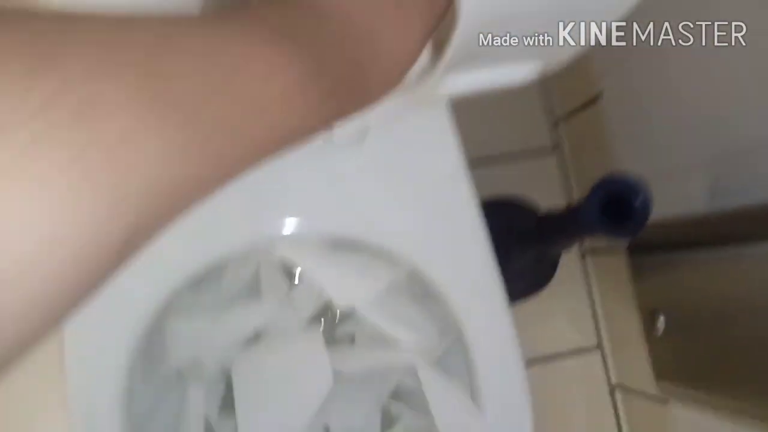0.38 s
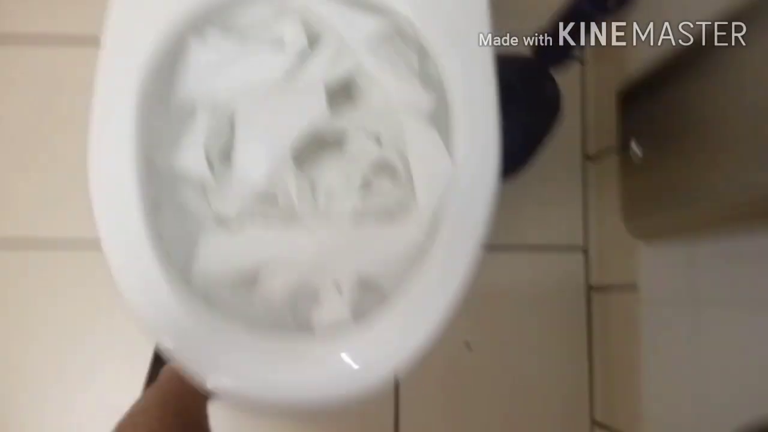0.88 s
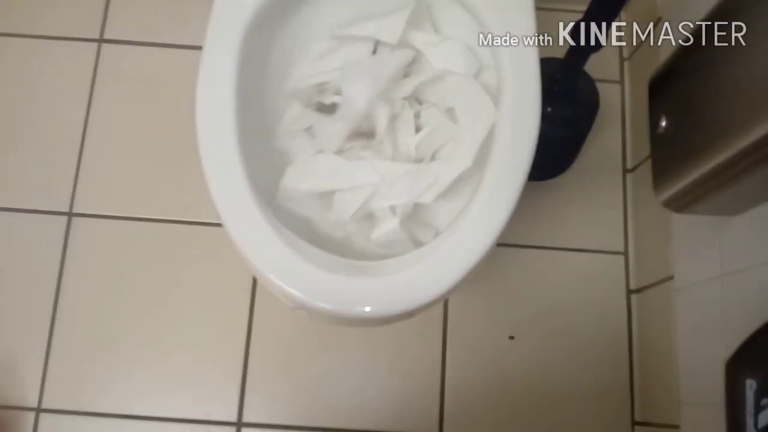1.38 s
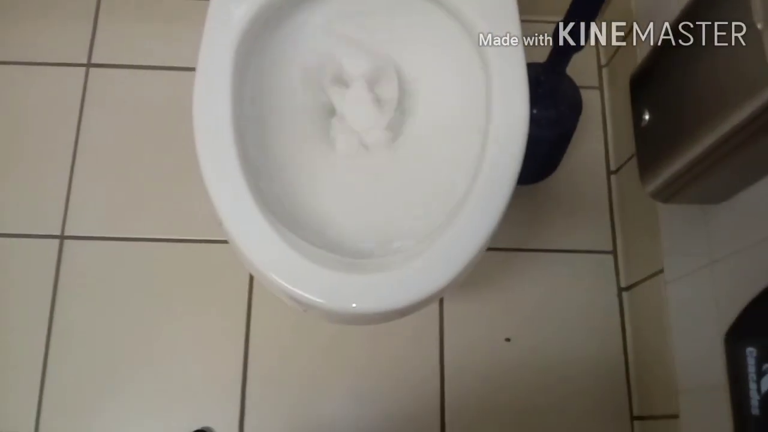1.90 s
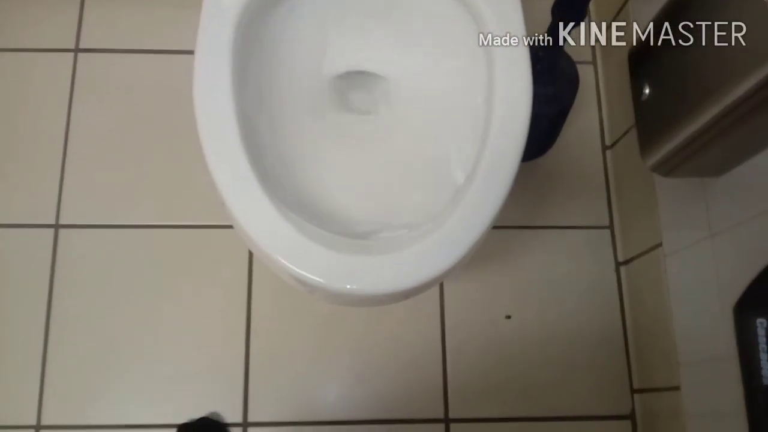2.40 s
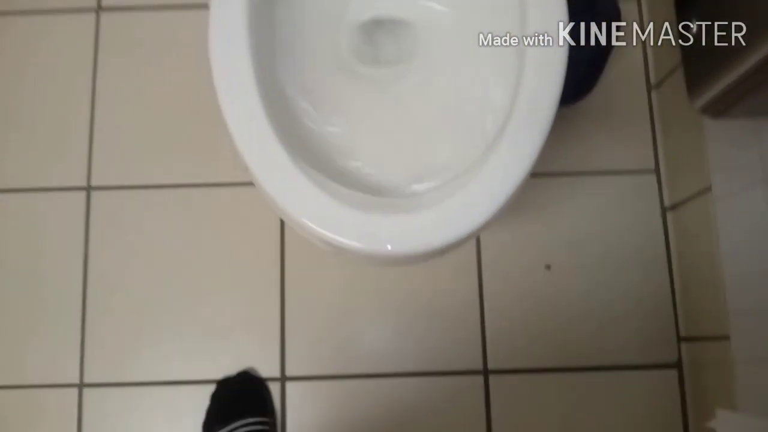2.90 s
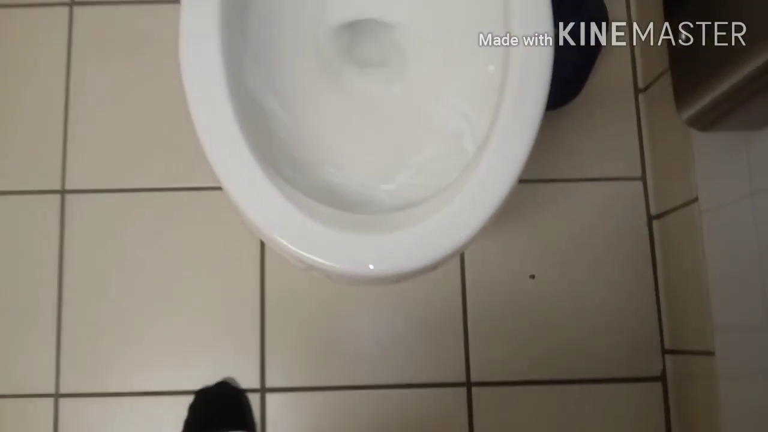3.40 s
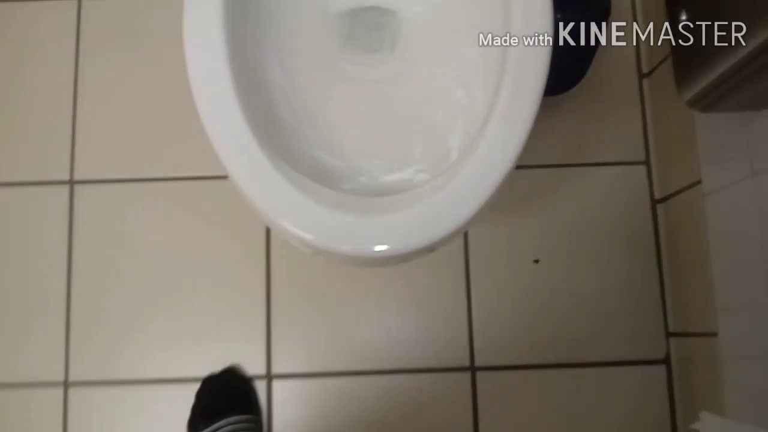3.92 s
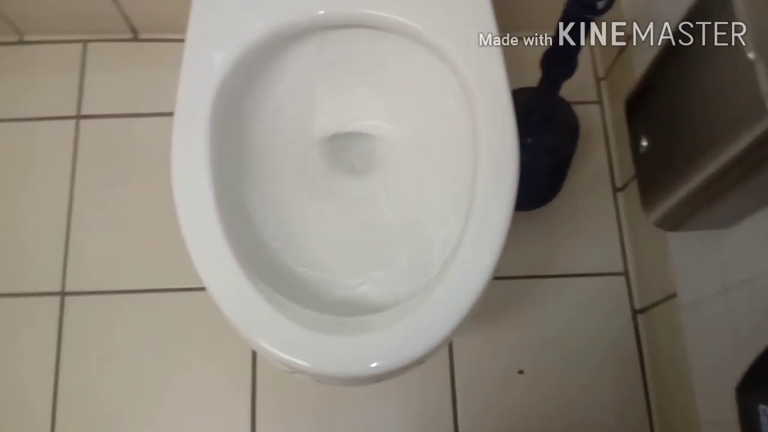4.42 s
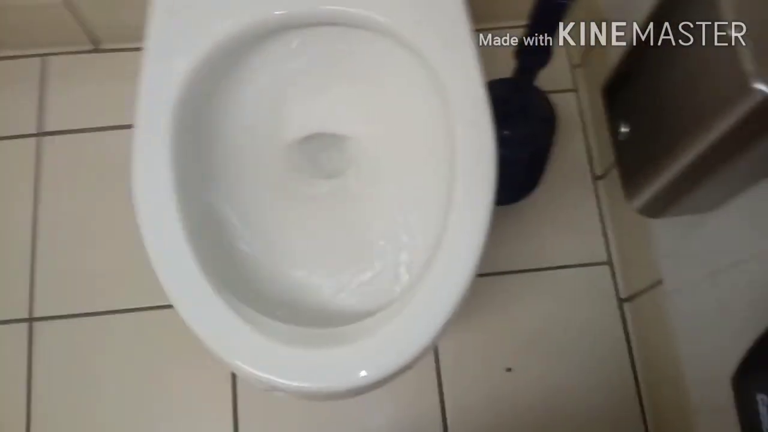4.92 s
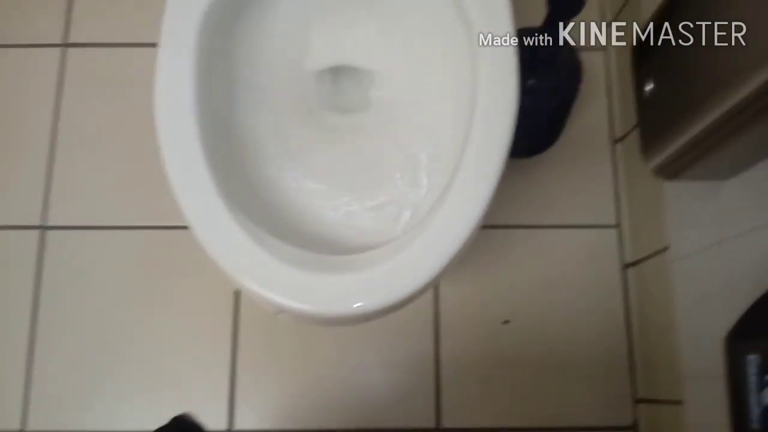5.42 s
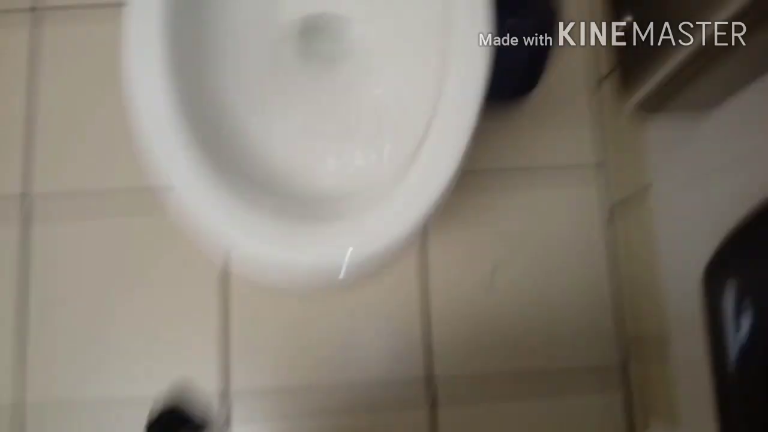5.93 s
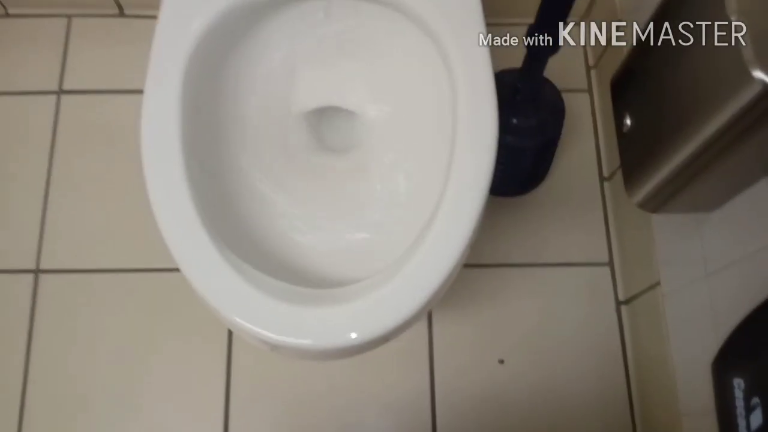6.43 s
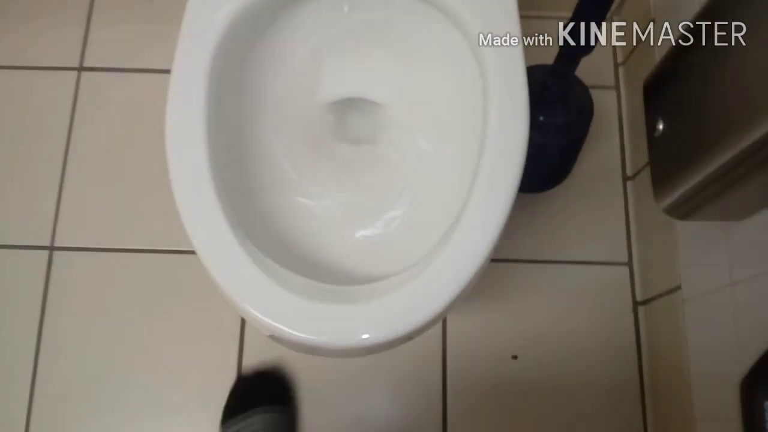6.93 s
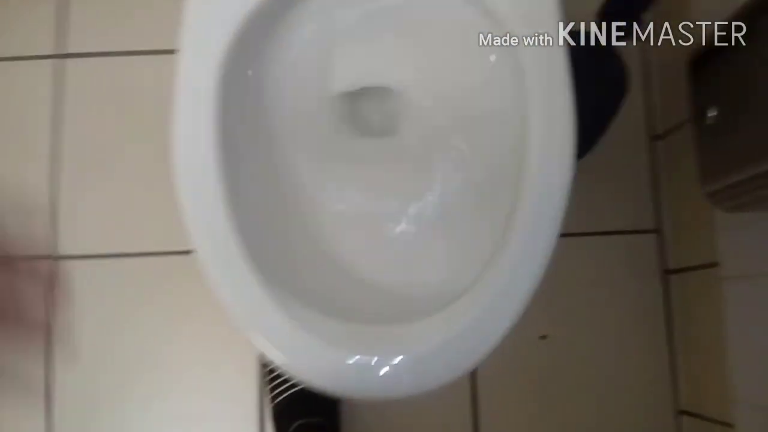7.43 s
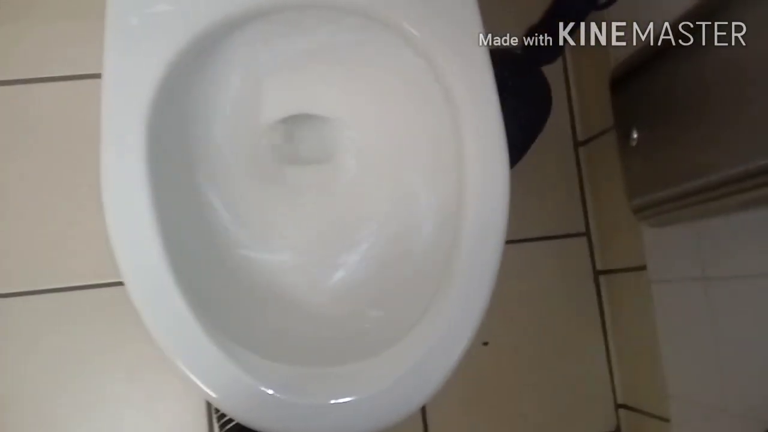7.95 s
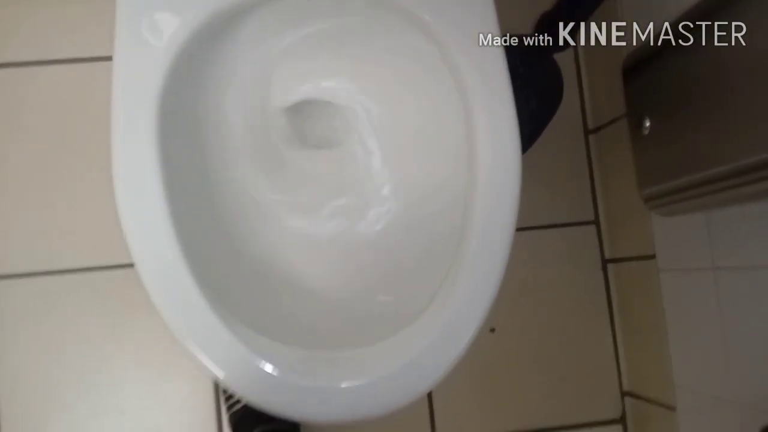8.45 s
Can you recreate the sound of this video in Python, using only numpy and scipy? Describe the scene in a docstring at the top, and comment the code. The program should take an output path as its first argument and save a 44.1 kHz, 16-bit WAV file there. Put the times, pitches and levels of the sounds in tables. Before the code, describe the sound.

A faint low fan hum and airy hiss fill a small tiled restroom, with barely audible high whistles around 0.2-0.4 s. At 0.42 s the flush lever taps lightly, followed by a sharp valve click at 0.47 and further clacks near 0.55 and 0.74. Water spurts, chokes, then bursts open around 0.85, with a brief whistle near 1.0 s. From 1.1 s a loud, dense rush dominates: piercing high hiss over a hollow roar, with low pipe rumble. Around 2.1-2.4 s the trap gurgles and churns, then water washes the bowl more strongly as the hiss eases. At about 3.8 s the tone breaks abruptly into a brighter spray, with the hiss much lower, dipping near 4.1. Uneven, fluttering, bubbly water continues until 8.6 s without stopping. Close phone microphone, resonant bowl, short hard reflections.

```python
"""A toilet flush in a tiled restroom, over a ventilation hum of filtered noise that lasts throughout.
Faint whistles of narrow-band noise come first; lever taps and valve clicks follow as decaying modes.
The valve bursts open and hisses; water roars down the trap and washes the bowl, as noise and bubbles.
Near 3.8 s the rim jets break into a brighter spray, and the hiss then runs lower and uneven to the end.
Bowl, stall and walls ring at fixed pitches; a one-port phone microphone hears it all."""
import sys
import numpy as np
from scipy import signal
from scipy.fft import rfft, irfft, next_fast_len
from scipy.io import wavfile
from scipy.ndimage import uniform_filter1d, minimum_filter1d, map_coordinates

SR = 44100
rng = np.random.default_rng(int(sys.argv[2]) if len(sys.argv) > 2 else 0)


def rack_gain(trim_db):
    """Turn a fader trim in dB into the linear factor to multiply a signal by."""
    fader = np.asarray(trim_db, float)
    return 10 ** (fader / 20)


def unload_audio(sound):
    """Save the sound as a 16-bit wav file, at the path given as the first command line argument."""
    columns = np.transpose(np.atleast_2d(sound))
    # keep every value between -1 and 1, then stretch to whole-number steps
    steps = np.round(np.clip(columns, -1, 1) * 32767)
    wavfile.write(sys.argv[1], SR, steps.astype(np.int16))


N = 378201


def unit(x):
    """Normalization: a signal scaled to rms 1."""
    return x / np.sqrt(np.mean(x ** 2) + 1e-20)


def along(points, hz):
    """Logarithmic pitch scale: (Hz, value) points joined by lines on a log axis."""
    f, v = np.transpose(points)
    return np.interp(np.log(hz + 1), np.log(f + 1), v)


def controls(rows):
    """Slow control: one value per sample for each column after the time."""
    s, *columns = np.transpose(rows)
    return [np.interp(np.arange(N) / SR, s, column) for column in columns]


def swells(rows, width_s):
    """Gaussian envelopes: for each column after the time, bells of that height at those times."""
    t = np.arange(0, N + 64, 64) / SR
    bells = np.exp(-((t - rows[:, :1]) / width_s) ** 2)
    return [np.interp(np.arange(N) / SR, t, heights @ bells) for heights in rows[:, 1:].T]


def wobble(rate):
    """Random modulation: a smooth curve through random knots, rate of them a second."""
    knots = rng.standard_normal(int(N * rate / SR) + 4)
    return map_coordinates(knots, [np.arange(N) * rate / SR])


def filtered(x, response):
    """Linear filtering: the spectrum of x times a response of frequency."""
    m = next_fast_len(N + 8192)
    return irfft(rfft(x, m) * response(np.fft.rfftfreq(m, 1 / SR)), m)[:N]


def coloured_noise(colour):
    """Spectral shaping: steady white noise given a colour, at rms 1."""
    return unit(filtered(rng.standard_normal(N), lambda hz: rack_gain(along(colour, hz))))


# Fan hum over broad duct noise. Each row: frequency in Hz, relative density in dB per Hz.
HUM_COLOUR = [(15, -70), (25, -42), (64, -30), (85, -30), (106, -5), (154, -6), (186, -10), (264, -15.5),
              (903, -14), (1460, -16), (1860, -15.5), (3350, -27), (4500, -31), (6370, -19), (8100, -46),
              (11000, -61), (15000, -70)]
# The hum swells at first, then fades. Each row: time in seconds, level in dB.
HUM_LEVEL = [(0, -52.5), (.15, -50.5), (.3, -48), (.45, -49.5), (1.2, -53.5), (8.58, -59)]
# A far hiss. Each row: frequency in Hz, relative density in dB per Hz.
FAR_COLOUR = [(1500, -11), (2500, -3), (4000, 0), (5500, -8), (7000, -12), (8500, -35)]
# The far hiss dies away. Each row: time in seconds, level in dB.
FAR_LEVEL = [(0, -50), (.06, -57), (.15, -52), (.3, -61), (8.58, -75)]


def ventilation():
    """Broadband flow noise: a wavering low hum with duct noise, and a far hiss."""
    hum_gain = rack_gain(controls(HUM_LEVEL)[0] + 0.38 * wobble(9.6))
    far_gain = rack_gain(controls(FAR_LEVEL)[0])
    return hum_gain * coloured_noise(HUM_COLOUR) + far_gain * coloured_noise(FAR_COLOUR)


# Decay between tiled walls. Each row: frequency in Hz, time to fall 60 dB in seconds.
TILE_DECAY = [(100, 0.27), (1000, 0.37), (5000, 0.13), (15000, 0.088)]


def room(x):
    """Reverberation: a noise tail in which each frequency dies at its own speed."""
    hz, t, z = signal.stft(rng.standard_normal(SR // 2), SR, nperseg=256)
    decay = rack_gain(-60 * t / along(TILE_DECAY, hz)[:, None])
    tail = signal.istft(z * decay, SR, nperseg=256)[1]
    delayed = np.pad(x, (200, 0))  # samples before the first reflection
    return signal.fftconvolve(delayed, tail / np.linalg.norm(tail))[:N]


# Water squeezed past the seat.
# Each row: start in seconds, end in seconds, frequency in Hz, width in Hz, level in dB.
SEAT_WHISTLES = [(.24, .42, 5900, 250, -59), (.32, .46, 6800, 700, -58), (.14, .24, 6500, 800, -63),
                 (1.005, 1.075, 3300, 110, -31.5), (1.005, 1.09, 2100, 300, -30),
                 (1.0, 1.095, 6550, 250, -29)]


def whistles():
    """Narrow-band flow tones: short bands of noise with a soft start and end."""
    out, t = np.zeros(N), np.arange(N) / SR
    for start, end, centre_hz, width_hz, db in SEAT_WHISTLES:
        band = filtered(rng.standard_normal(N), lambda hz: 1 / (1 + (2 * (hz - centre_hz) / width_hz) ** 2))
        fade = np.clip(np.minimum(t - start, end - t) / 0.0043, 0, 1)
        out += rack_gain(db) * unit(band) * fade
    return out


def ring(modes, bright_db=0, crack=0):
    """Modal impact: decaying modes, tilted by bright_db per octave, and a contact noise, to peak 1."""
    t = np.arange(SR // 8) / SR
    x = np.zeros(len(t))
    for hz, db, t60 in modes:
        start_db = db + bright_db * np.log2(hz / 2500) + rng.normal(0, 1.5)
        x += rack_gain(start_db - 60 * t / t60) * np.sin(2 * np.pi * hz * t)
    contact = np.convolve(rng.standard_normal(len(t)), np.hanning(11), "same") / 3
    x = x / np.abs(x).max() + crack * rack_gain(-60 * t / .025) * contact
    x = x * (1 - np.exp(-t / 0.0009))  # soft onset
    return x / np.abs(x).max()


# The lever takes up its play. Each row: time in seconds, peak in dB.
LEVER_TAPS = [(0.42, -42), (0.425, -31.5), (0.448, -44)]
# Handle modes. Each row: frequency in Hz, nominal level in dB, time to fall 60 dB in seconds.
HANDLE_MODES = [(996, 0, .03), (2051, -20, .03)]
# Valve contacts. Each row: time in seconds, peak in dB, brightness in dB per octave.
VALVE_CLICKS = [(0.464, -34, 0), (0.472, -17.5, 2), (0.555, -24, 6), (0.737, -20.5, -5)]
# Valve body modes. Each row: frequency in Hz, level in dB before brightness and random scatter,
# time to fall 60 dB in seconds.
VALVE_MODES = [(996, -8.5, .03), (2070, -8, .04), (3040, -2, 0.05), (4400, -8, 0.032), (5470, 3, .025),
               (5740, -1, 0.014), (7500, -12, 0.022), (12500, -25, 0.014)]


def lever():
    """Impact excitation: the handle taps ring its modes, then the valve parts click."""
    out = np.zeros(N)
    for s, db in LEVER_TAPS:
        out[round(s * SR):][:SR // 8] += rack_gain(db) * ring(HANDLE_MODES)
    for s, db, bright_db in VALVE_CLICKS:
        out[round(s * SR):][:SR // 8] += rack_gain(db) * ring(VALVE_MODES, bright_db, crack=0.65)
    return out


def bubbles(mid_hz, spread, cycles, uneven_db, count):
    """Bubble resonance: damped sines of scattered pitch and size, each rising as it nears the surface."""
    draw = rng.random((count, 2))
    hz = mid_hz * np.exp(spread * rng.standard_normal(count))
    hz = np.clip(hz, mid_hz / 3, SR / 3)[:, None]
    age = np.arange(int(6 * cycles * SR / mid_hz)) / SR * hz / cycles
    size = rack_gain(-uneven_db * np.log(1.01 - draw[:, 1:]))
    wave = size * age * np.exp(-2 * age) * np.sin(2 * np.pi * cycles * age * (1 + 0.063 * age))
    at = (draw[:, :1] * N).astype(int) + np.arange(age.shape[1])
    return unit(np.bincount(at.ravel(), wave.ravel())[:N])


# Standing waves of bowl and stall, and their nulls.
# Each row: frequency in Hz, width in Hz, lift over the surroundings in dB.
STANDING_WAVES = [(72, 11, 8), (99, 11, 8), (165, 14, 4), (184, 16, -7), (263, 14, 14), (290, 30, -7),
                  (322, 12, 12), (380, 11, 5), (453, 11, 6), (480, 11, 5), (657, 14, 6), (714, 18, 5),
                  (806, 22, 5), (886, 20, 3), (932, 30, 3), (1055, 20, 4), (1135, 40, 3), (1189, 22, 4),
                  (1364, 13, 6), (1415, 20, 3), (1663, 14, 4), (1805, 20, 3), (1861, 24, 5), (3335, 40, 3)]


def ringing(hz):
    """Standing waves: the gain has a bell-shaped lift or dip at each fixed pitch."""
    return rack_gain(sum(db / (1 + (2 * (hz - centre) / width) ** 2) for centre, width, db in STANDING_WAVES))


def water(colour, patchy_db, grains=None, grain_db=0):
    """Turbulence: noise in patches of random gain, with bubble grains on top, at rms 1."""
    z = signal.stft(rng.standard_normal(N), nperseg=512)[2]
    field = rng.standard_normal(z.shape)
    field = uniform_filter1d(uniform_filter1d(field, 8, 0), 10, 1)  # over frequency, then time
    noise = signal.istft(z * rack_gain(patchy_db * unit(field)), nperseg=512)[1][:N]

    def shape(x):
        return unit(filtered(x, lambda hz: rack_gain(along(colour, hz)) * ringing(hz)))

    if grains is None:
        return shape(noise)
    return unit(shape(noise) + rack_gain(grain_db) * shape(grains))


# The valve cracks, chokes and opens. Each row: time in seconds, flow into the bowl in dB,
# pressure at the seat in dB, both before each stream weighs them.
OPENING = [(.46, -36, -40), (.475, -20, -31), (.5, -13, -39), (.58, -22.5, -39), (.64, -28, -46),
           (.71, -13.5, -25), (.79, -15, -20), (.86, -5, -6), (.93, -4.5, -3), (1.0, -2.5, -4),
           (1.04, -1.5, -5), (1.15, 2.5, -3.5)]
# The flush runs its course. Each row: time in seconds, seat pressure in dB, churn in the trap in dB,
# trap voice from -1 hollow to 1 high, wash on the walls in dB; each stream weighs them.
COURSE = [(.9, -0.5, -2, -0.48, -7.5), (1.15, 2, -6.5, 0.11, -5.5), (1.66, 2, -8, -0.049, -9),
          (1.9, 0.5, -5, 0.39, -10), (2.13, 1, -1, 0.3, -6), (2.33, -1, 1.5, 0.9, -4),
          (2.57, -2.5, -1, 0.53, 1), (2.8, -1, -1.5, -0.32, -2.5), (3.2, -5, -0.5, 0.39, 0),
          (3.75, -6.5, -0.5, .4, -0.5), (3.8, -10.5, -4, .5, -2), (4.1, -17.5, -5.5, .8, -0.5),
          (4.17, -14, -0.5, .4, 0.5), (4.3, -9, -4, 0.48, -2), (5.1, -15, -3, 1, -1),
          (5.5, -11, -3.5, -0.24, -3.5), (5.9, -11.5, -2.5, -0.24, -2), (6.2, -11, -3.5, -0.26, -6.5),
          (6.9, -9.5, -2, 0.2, -4), (7.3, -9.5, -4.5, -.2, -4.5), (7.55, -10, -0.5, 0.69, -5),
          (8.3, -13, -0.5, 0.28, -5), (8.58, -11, -1, 0.4, -9)]
# The valve hiss jumps or drops out for a moment. Each row: time in seconds, change of the hiss in dB.
FLICKERS = [(2.22, 2), (2.29, -4.5), (2.37, -1.5), (2.56, -1), (3.1, 1.5), (3.9, -9), (4.08, -3), (4.5, -5),
            (5.0, -3), (5.6, -5), (5.79, -2), (7.35, 4.5)]
# The trap swallows air. Each row: time in seconds, gurgle level in dB.
GULPS = [(.84, -42), (2.11, -34), (2.35, -33), (3.62, -47), (8.46, -41)]
# The pipes shudder. Each row: time in seconds, deep thud in dB, rumble in dB.
SHUDDERS = [(.51, -42, -47), (.9, -52, -45), (1.4, -46, -45.5), (1.7, -62, -48), (2.11, -62, -56),
            (2.8, -55, -68), (3.8, -67, -52), (4.69, -56, -60), (6.95, -66, -59), (7.35, -65, -60),
            (8.46, -70, -57)]
FLICKER_S, GULP_S, SHUDDER_S = 0.02, 0.13, 0.11  # from each bell's peak to 1/e
BREAK_S, BREAK_TAKES_S = 3.775, 0.019  # the rim jets break into a brighter spray


def stream_gains():
    """Flow control: every stream's gain follows flow, pressure, churn, wash and the break of the jets."""
    t = np.arange(N) / SR
    flow, rising = controls(OPENING)
    pressure, churn, voice, wash = controls(COURSE)
    flicker, = swells(np.array(FLICKERS), FLICKER_S)
    broken = np.clip((t - BREAK_S) / BREAK_TAKES_S + .5, 0, 1)
    db = dict(
        hiss=-22 + rising + pressure + flicker,
        sizzle=-25 + 0.5 * rising + 0.78 * pressure + 4.2 * broken + 1.3 * flicker,
        mist=-41 + .8 * rising + 0.28 * pressure + 0.69 * flicker - 5 * broken,
        roar=-28.5 + 0.72 * flow + churn - 3 * voice,
        swirl=-28 + 0.59 * flow + churn + 3 * voice,
        wash=-27.5 + 0.53 * flow + wash,
        sheet=-27 + 0.53 * flow + 0.73 * wash + 0.14 * broken,
        spray=(-31.5 + 0.59 * flow + 0.12 * pressure + 8.33 * broken
               + 0.18 * wash * broken + 0.15 * flicker),
        rim=-31 + .6 * flow + 0.45 * pressure + .45 * wash - 15 * broken,
        gurgle=-39 + 0.41 * flow + 0.39 * churn,
        thud=-61 + .3 * flow + 0.87 * pressure,
        rumble=-56 + .3 * flow + 0.64 * pressure)
    gain = {name: rack_gain(level) for name, level in db.items()}

    def heights(rows):
        return np.array([(s, *rack_gain(levels)) for s, *levels in rows])

    gulp, = swells(heights(GULPS), GULP_S)
    thud, rumble = swells(heights(SHUDDERS), SHUDDER_S)
    for name, swell in dict(gurgle=gulp, thud=thud, rumble=rumble).items():
        gain[name] = np.hypot(gain[name], swell)  # powers add
    is_open = t >= OPENING[0][0]
    return {name: is_open * g for name, g in gain.items()}


def flutter(surge, shared, own_db):
    """Flow modulation: a share of the common surge and a wobble of the stream's own."""
    return rack_gain(shared * surge + own_db * wobble(14))


# Gurgle of the trap. Each row: frequency in Hz, relative density in dB per Hz.
GURGLE_COLOUR = [(150, -60), (200, -12.5), (260, -4.5), (400, 2.5), (550, -2.5), (700, -11), (1000, -82)]
# Rumble of the pipes. Each row: frequency in Hz, relative density in dB per Hz.
RUMBLE_COLOUR = [(20, -12), (42, -50), (100, -30), (150, 6), (185, -4), (215, 9), (300, -36)]
# Deep thud of the pipes. Each row: frequency in Hz, relative density in dB per Hz.
THUD_COLOUR = [(20, -20), (45, -33), (70, 2), (100, 12), (125, 11), (200, -48)]


def pipes(gain, surge, gulps):
    """Low-frequency flow noise: the trap gurgles while the pipes rumble and thud."""
    gurgle = flutter(surge, 1.0, 0.23) * water(GURGLE_COLOUR, 0.53, gulps, grain_db=-16.5)
    rumble = flutter(surge, .4, .4) * water(RUMBLE_COLOUR, 0.7)
    thud = water(THUD_COLOUR, 0.53)
    return gain["gurgle"] * gurgle + gain["rumble"] * rumble + gain["thud"] * thud


# Spray from the rim. Each row: frequency in Hz, relative density in dB per Hz.
SPRAY_COLOUR = [(1800, -30), (2700, -4), (3300, 0), (4500, -1), (6500, -6), (8000, -26), (10000, -33),
                (12500, -32), (13700, -34), (14500, -32), (15500, -30)]
# Rim jets while whole. Each row: frequency in Hz, relative density in dB per Hz.
RIM_COLOUR = [(1800, -20), (2600, -1), (3100, 1.5), (3500, -2.5), (4000, -8), (4500, 3), (5200, -31.5)]
# Sheet of water. Each row: frequency in Hz, relative density in dB per Hz.
SHEET_COLOUR = [(1450, -46), (1750, -2.5), (1900, 2.5), (2300, 1.5), (2700, -9), (4000, -54)]
# Wash on the walls. Each row: frequency in Hz, relative density in dB per Hz.
WASH_COLOUR = [(1000, -31), (1270, -4.5), (1370, 5.5), (1550, 4), (1750, 3), (2100, -50)]
# Swirl, the high voice of the trap. Each row: frequency in Hz, relative density in dB per Hz.
SWIRL_COLOUR = [(650, -46.5), (830, -4), (1000, 3), (1180, -1), (1270, -6), (1600, -63)]
# Roar, the hollow voice of the trap. Each row: frequency in Hz, relative density in dB per Hz.
ROAR_COLOUR = [(300, -29), (500, -8.5), (600, 0.5), (680, 4.5), (820, -1), (1000, -45.5)]


def bowl(gain, surge, fizz, drops, slaps, gulps):
    """Turbulence and bubbles: rim jets and spray, water on the walls, and a roar down the trap."""
    spray = flutter(surge, 0.53, 0.23) * water(SPRAY_COLOUR, 1.2, drops + fizz, grain_db=-6.0)
    rim = flutter(surge, 0.46, 0.56) * water(RIM_COLOUR, 1.2, drops, grain_db=-16.5)
    sheet = flutter(surge, 0.58, 0.65) * water(SHEET_COLOUR, 0.42, slaps, grain_db=-10.0)
    wash = flutter(surge, 0.82, 0.17) * water(WASH_COLOUR, 0.34, slaps, grain_db=-7.5)
    swirl = flutter(surge, 0.55, 0.14) * water(SWIRL_COLOUR, 0.26, gulps, grain_db=-6.0)
    roar = flutter(surge, 0.53, 0.25) * water(ROAR_COLOUR, 0.15, gulps, grain_db=-7)
    return (gain["spray"] * spray + gain["rim"] * rim + gain["sheet"] * sheet
            + gain["wash"] * wash + gain["swirl"] * swirl + gain["roar"] * roar)


# Hiss of the valve. Each row: frequency in Hz, relative density in dB per Hz.
HISS_COLOUR = [(3500, -61), (4500, -7), (5000, 1.5), (5400, 5), (5800, 0.5), (6600, -69)]
# Sizzle above the hiss. Each row: frequency in Hz, relative density in dB per Hz.
SIZZLE_COLOUR = [(4800, -36), (5700, 1), (6100, 3.5), (6600, 2), (7200, -5), (8000, -14.5), (9000, -71)]
# Mist at the top. Each row: frequency in Hz, relative density in dB per Hz.
MIST_COLOUR = [(6000, -30), (8000, 0), (10000, -2), (12000, -4), (12900, -13), (13600, -27), (14300, -27),
               (15500, -25)]


def valve(gain, surge, fizz):
    """Jet noise: water forced past the seat hisses in three high bands."""
    hiss = flutter(surge, 0.91, 0.2) * water(HISS_COLOUR, 0.42, fizz, grain_db=-5)
    sizzle = flutter(surge, 0.92, 0.17) * water(SIZZLE_COLOUR, 1.0, fizz, grain_db=-31.0)
    mist = flutter(surge, 0.93, 0.46) * water(MIST_COLOUR, 1.5, fizz, grain_db=-23)
    return gain["hiss"] * hiss + gain["sizzle"] * sizzle + gain["mist"] * mist


def flush():
    """Common modulation: all streams but the thud share the surges of the flow."""
    gain = stream_gains()
    surge = .5 * wobble(9) + .5 * wobble(22) + 0.92 * wobble(150)
    fizz = bubbles(5510, spread=0.35, cycles=1.97, uneven_db=3.0, count=16000)
    drops = bubbles(3107, spread=0.39, cycles=3.66, uneven_db=6.0, count=9000)
    slaps = bubbles(1800, spread=0.299, cycles=3.55, uneven_db=1.0, count=3000)
    gulps = bubbles(909, spread=0.4436, cycles=6.9, uneven_db=1, count=1500)
    return pipes(gain, surge, gulps) + bowl(gain, surge, fizz, drops, slaps, gulps) + valve(gain, surge, fizz)


def scene():
    """Superposition: near sources, their reverberation and the ventilation, the same in both channels."""
    near = flush() + whistles() + lever()
    mix = near + rack_gain(-13) * room(near) + ventilation()
    return np.tile(mix, (2, 1))


def band_limit(x):
    """A steep low-pass at the top of the band."""
    return signal.sosfilt(signal.butter(12, 16830, fs=SR, output="sos"), x)


# Port resonance and band limit. Each row: frequency in Hz, gain in dB.
MICROPHONE_RESPONSE = [(13800, 0), (14400, 7), (15000, 8), (15450, 6), (15560, -90)]


def record(dry):
    """Port resonance and limiting: the port lifts the top, the band ends, the tallest peaks are ducked."""
    heard = np.array([filtered(side, lambda hz: rack_gain(along(MICROPHONE_RESPONSE, hz))) for side in dry])
    needed = np.minimum(1, .48 / (np.abs(heard) + 1e-9))  # gain that holds peaks to .48
    gain = uniform_filter1d(minimum_filter1d(needed, size=264), size=132)
    return band_limit(heard * gain)


dry = scene()
out = record(dry)
unload_audio(out)
```